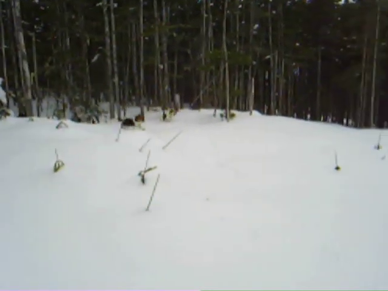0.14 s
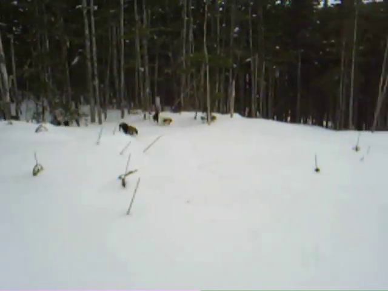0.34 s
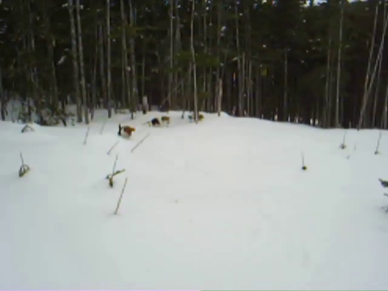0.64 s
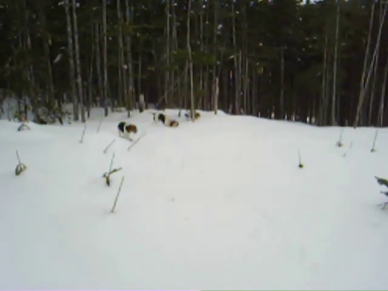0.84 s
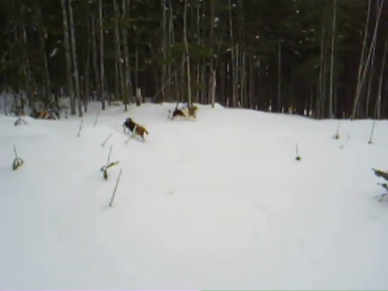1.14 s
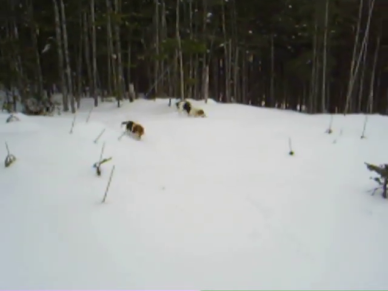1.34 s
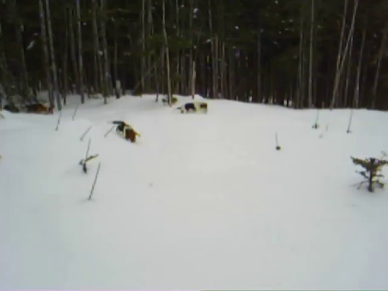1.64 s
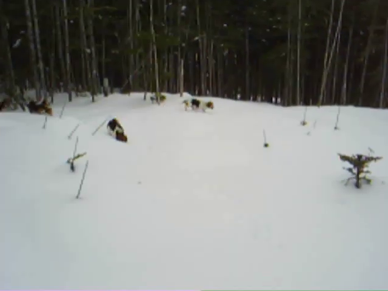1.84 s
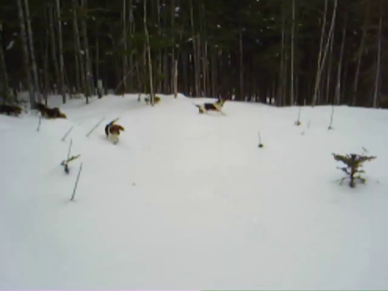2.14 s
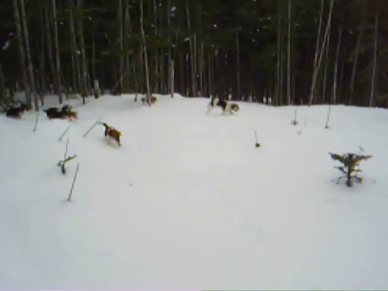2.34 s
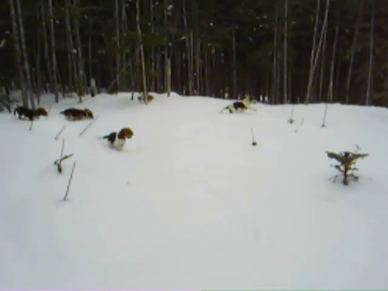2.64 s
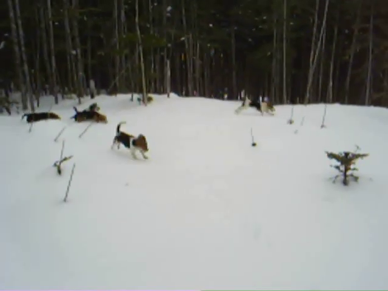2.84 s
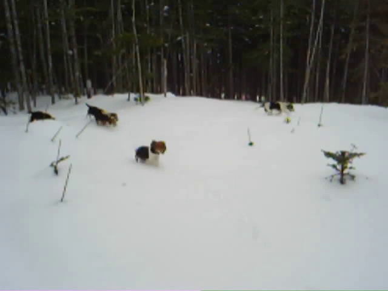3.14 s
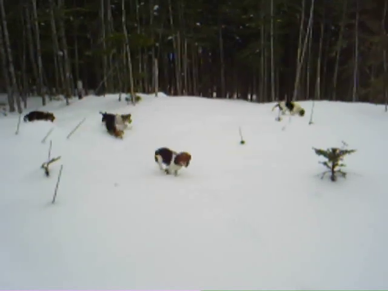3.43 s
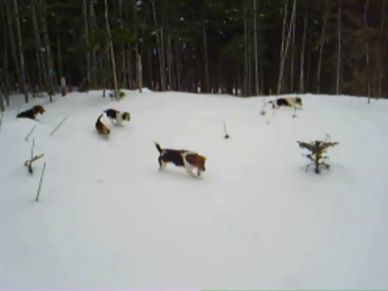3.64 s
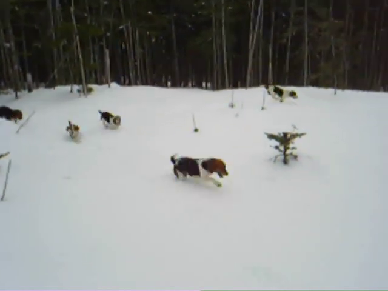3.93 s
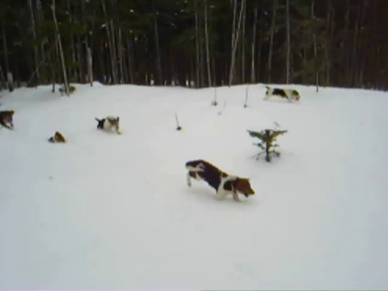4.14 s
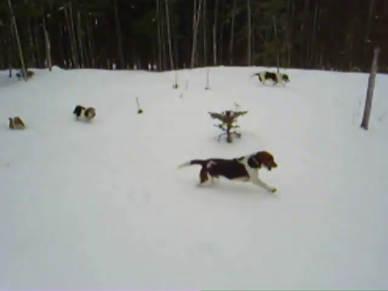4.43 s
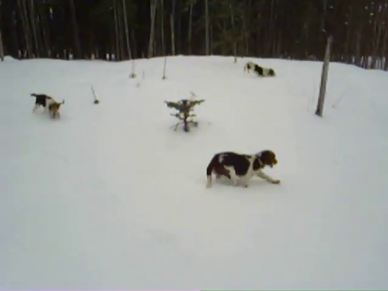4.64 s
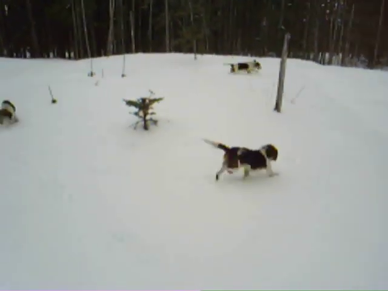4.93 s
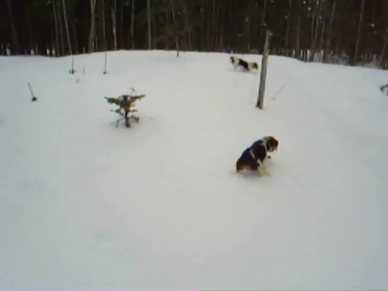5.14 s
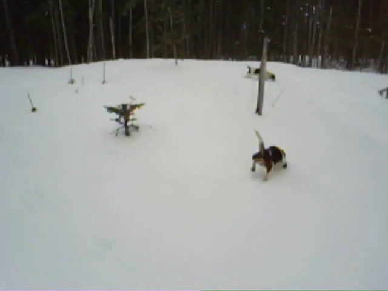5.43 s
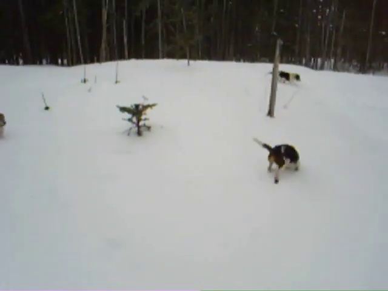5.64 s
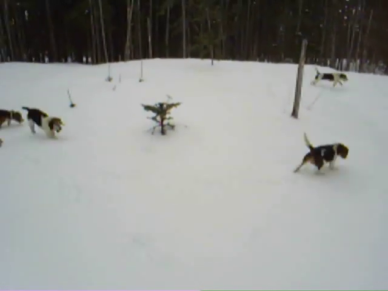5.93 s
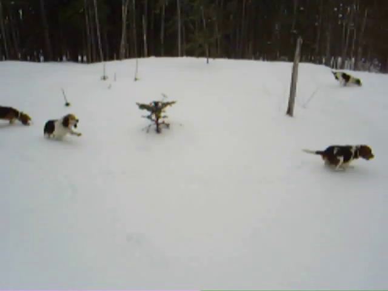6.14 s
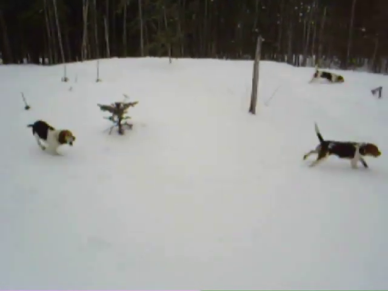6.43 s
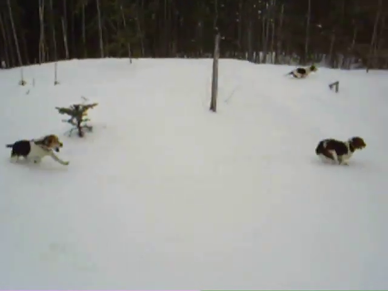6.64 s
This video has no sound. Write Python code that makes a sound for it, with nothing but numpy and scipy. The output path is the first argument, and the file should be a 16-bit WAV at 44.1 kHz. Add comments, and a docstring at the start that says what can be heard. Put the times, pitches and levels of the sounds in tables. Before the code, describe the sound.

A hound pack cries in the open by a wood, yelps flipping down into gravelly bays with brief gaps. The calls stretch into a rising high howl and a shorter ragged one, then thin out to near silence, with a tiny whine and paws in snow. A sharp call opens a last long, low howl. Woody echoes trail behind; a cheap, dull microphone distorts, with hiss swelling under the voices and small low thumps.

```python
"""A pack of beagles gives tongue at a snowy wood edge: hoarse bays and clear yelps from the start, most
calls a yelp breaking into a bay about an octave lower; later two high howls, a whine, paws and a low howl.
Voices are harmonic sums shaped by a throat response, half lines and random modulation making them hoarse.
Trunks echo them by convolution with scattered impulses, and noise makes air and paws. A narrow-band
recorder hisses as the calls swell, thumps softly as its zero line snaps back, and overloads."""
import sys
import numpy as np
from scipy import signal
from scipy.fft import rfft, irfft
from scipy.io import wavfile
from scipy.ndimage import uniform_filter1d

SR = 44100
rng = np.random.default_rng(int(sys.argv[2]) if len(sys.argv) > 2 else 0)


def digitize_waveform(pressure):
    """Quantize a signal to 16-bit integers and store it at the path in sys.argv[1].

    Rows of a 2-D input are taken as channels; values are limited to [-1, 1].
    """
    field = np.atleast_2d(pressure).T
    bounded = np.clip(field, -1, 1)
    quanta = np.round(bounded * 32767).astype(np.int16)
    wavfile.write(sys.argv[1], SR, quanta)


N = 298557
TIME = np.arange(N) / SR
BAND_EDGE_HZ = 4080


def from_db(db):
    """Level law: 20 dB is a factor of ten in amplitude."""
    return 10 ** (np.asarray(db) / 20)


def rms_one(x):
    """Normalisation to unit root-mean-square amplitude."""
    return x / np.sqrt(np.mean(x ** 2) + 1e-20)


def gain_at(points, hz):
    """Frequency response: the gain of a (frequency [Hz], level [dB]) curve, read on a log-frequency axis."""
    knots_hz, knots_db = np.transpose(points)
    return from_db(np.interp(np.log(hz + 1e-9), np.log(knots_hz), knots_db))


def coloured(x, points):
    """Spectral filtering: weights the noise spectrum, cuts it above the band edge and sets its rms to 1."""
    hz = np.fft.rfftfreq(len(x), 1 / SR)
    spectrum = rfft(x) * gain_at(points, hz) * (hz < 1.1 * BAND_EDGE_HZ)
    return rms_one(irfft(spectrum, len(x)))


def flutter(rate_hz, size):
    """Low-passed noise: a random wander up to a given rate, spread about 1."""
    run_in = SR // 8
    slow = signal.lfilter(*signal.butter(2, rate_hz, fs=SR), rng.standard_normal(size + run_in))
    return slow[-size:] / slow.std()


def note_time(start, length, edge_s):
    """Gating: the samples a note covers, its soft-edged gate, and the time since its start."""
    at = np.flatnonzero((TIME > start - edge_s) & (TIME < start + length + edge_s))
    t = TIME[at] - start
    edge = np.clip(np.minimum(t, length - t) / edge_s, -1, 1)
    gate = .5 + .5 * np.sin(np.pi / 2 * edge)
    return at, gate, np.clip(t, 0, length)


def envelope_db(t, length, swell_db, shape):
    """Amplitude envelope: attack, a hold that swells or tires, and release, all linear in dB."""
    attack_s, start_db, release_s, end_db = shape
    attack = np.clip(1 - t / attack_s, 0, 1)
    release = np.clip(1 - (length - t) / release_s, 0, 1)
    return swell_db * (t / length - .5) - start_db * attack - end_db * release


# response of throat and open mouth: (frequency [Hz], gain [dB])
THROAT = [(400, -35.5), (580, 6), (750, -1), (900, 10.5), (1100, 8.5), (1400, -4), (1700, 9), (1900, 2.5),
          (2200, 2.5), (2700, -6), (3050, -5), (3400, -2)]
LURCH = .065   # pitch bend [share of pitch] at full roughness


def vocal_folds(pitch, slope_db, doubling, rough, dull_hz, count=7, waver=0.0033):
    """Source-filter voice: unequal cycles add half lines; chaotic vibration bends and smears every line."""
    size = len(pitch)
    lurch = LURCH * rough * flutter(55, size)
    bent_pitch = pitch * (1 + lurch + waver * flutter(50, size))
    phase = 2 * np.pi * np.cumsum(bent_pitch) / SR
    wave = 0
    for k in np.arange(1, 2 * count + 1) / 2:   # whole k: harmonics; half k: period doubling
        line_hz = k * pitch
        overtone_gain = from_db(slope_db * np.log2(max(k, 1)))
        height = gain_at(THROAT, line_hz) * overtone_gain / np.hypot(1, (line_hz / dull_hz) ** 2)
        if k % 1:   # half lines pass only above the lowest throat resonance
            height = height * doubling * np.clip((line_hz - 400) / 100, 0, 1)
        # upper lines break up first
        chaos = np.clip(.85 * rough * k ** .3, 0, 1)
        smear = (flutter(125, size) + 1j * flutter(125, size)) / np.sqrt(2)
        modulation = np.sqrt(1 - chaos ** 2) + chaos * smear
        wave = wave + height * modulation * np.exp(1j * (k * phase + rng.uniform(0, 2 * np.pi)))
    # the lungs keep the strength steady however rough the tone
    power = uniform_filter1d(np.abs(wave) ** 2, SR // 90) / 2
    return wave.real / np.sqrt(power + 1e-12)


# relative spectrum of the still air: (frequency [Hz], density [dB per Hz])
AIR = [(15, -38), (25, -8.5), (395, -14), (449, -14), (1380, -14), (4000, -22), (5200, -57), (8800, -120)]
AIR_DB = -46.5   # rms level before the recorder's overload


def still_air():
    """Stationary noise: random pressure with a fixed spectrum forms the steady background."""
    return from_db(AIR_DB) * coloured(rng.standard_normal(N), AIR)


# envelope of a bay: (attack [s], depth below hold at start [dB], release [s], depth at end [dB])
BAY_SHAPE = (0.014, 7.9, 0.023, 8.3)
BREAK_ROUGH, BREAK_S = .7, .022   # extra share of roughness at the start; its decay time
FAIL_ROUGH, FAIL_BEFORE_S, FAIL_S = 0.42, 0.02, .014   # extra share near the end; its lead and spread
STEADY_ROUGH = 0.93     # share of the listed roughness present throughout
BREAK_BRIGHT_DB = 5.5   # overtone slope [dB per octave] per unit of extra roughness share
BAY_TOP_HZ = 4300       # sets the number of harmonics
# hoarse notes, mostly low with a few high squeals, each one glide; doubling and roughness are base values:
# (start [s], length [s], first pitch [Hz], last pitch [Hz], level [dB], swell over the note [dB],
#  mean overtone slope [dB per octave], period doubling [0-1], roughness [0-1])
BAYS = [ (-.02, 0.092, 590, 582, -23, 1.5, -11, .15, 0.52),
        (0.138, 0.078, 1391, 1376, -19.5, 5.5, -9, 0.22, 0.21),
        (0.202, 0.072, 1528, 1855, -22, -6, 3.5, 0.1, 0.6),
        (0.337, 0.064, 607, 611, -14.5, 11.5, -9, 0.26, 0.65),
        (0.379, .058, 608, 546, -8, -7, -15.5, .06, .2), (0.43, 0.044, 702, 638, -15, 0.5, -14, 0.33, 0.32),
        (.81, 0.16, 581.3, 544.5, -11, -6.5, -8.5, 0.23, 0.49),
        (0.933, 0.094, 688.6, 608, -25, -4.5, -10.5, 0.46, 0.48),
        (1.258, 0.051, 595, 661, -22, 5, -3, 0.1, 0.35),
        (1.299, 0.077, 701, 673.4, -13.5, 6, -7.5, 0.07, 0.38),
        (1.331, 0.169, 560.5, 563.6, -11.5, 0, -9.5, 0.23, 0.6),
        (1.758, 0.074, 591.3, 540.4, -10.5, 4, -4, 0.28, 0.36),
        (1.85, 0.089, 667, 691, -14, 1.5, -15, 0, 0.17), (1.917, .055, 718, 818, -14, 1.5, -18, 0.16, 0.07),
        (1.955, 0.066, 726.5, 675, -21, 1, -15, .05, 0.29),
        (2.021, 0.052, 736, 641, -13, 9, -8.5, 0.1, 0.9),
        (2.058, 0.096, 561.7, 565.7, -11, -1, -8.5, 0.36, 0.5),
        (2.394, 0.044, 616, 644, -16.5, 1, -6, 0.5, 0.13),
        (2.428, .09, 725.5, 835, -11.5, -3.5, -14, 0.25, .15),
        (2.518, 0.12, 642, 534.3, -11, -8.5, -8.5, 0.24, 0.4),
        (2.619, 0.03, 693, 610, -13, -3, -11.5, 0.2, 0.27),
        (2.973, .1, 671.7, 545.6, -12, -2.5, -8.5, 0.35, 0.51),
        (3.062, 0.025, 732, 645, -12.5, -4.5, -12.5, 0.06, 0.14),
        (3.37, 0.067, 734.4, 675, -17, 12.5, -9.5, 0.3, 0.88),
        (3.424, 0.27, 686.7, 683.8, -12.5, -4, -12, 0.65, 0.63),
        (4.38, 0.052, 774, 743, -17.5, -3, -8.5, 0.4, 0.22),
        (4.836, 0.11, 654.6, 668.4, -11.5, -6, -9, 0.98, 0.54),
        (6.035, 0.034, 601, 658, -18, 2.5, -10.5, 0.4, .2),
        (6.034, 0.037, 1200, 1229, -8, -6.5, -12.5, 0.16, 0.37), ]


def bays(edge_s=0.0037, dull_hz=2600):
    """Nonlinear phonation: hoarse notes, mostly low, a few squeals, rough and bright at onset and failure."""
    out = np.zeros(N)
    for start, length, first_hz, last_hz, level_db, swell_db, slope_db, doubling, rough in BAYS:
        at, gate, t = note_time(start, length, edge_s)
        pitch = first_hz + (last_hz - first_hz) * t / length
        onset = BREAK_ROUGH * np.exp(-t / BREAK_S)
        failure = FAIL_ROUGH * np.exp(-((length - t - FAIL_BEFORE_S) / FAIL_S) ** 2)
        breaking = onset + failure
        slope = slope_db + BREAK_BRIGHT_DB * (breaking - breaking.mean())
        tone = vocal_folds(pitch, slope, doubling, rough * (STEADY_ROUGH + breaking), dull_hz,
                           count=int(BAY_TOP_HZ / pitch.mean()))
        out[at] += gate * from_db(level_db + envelope_db(t, length, swell_db, BAY_SHAPE)) * tone
    return out


def chest(voice, lowest_hz=505):
    """Radiation efficiency: the small chest radiates little below its pitch, a steep high-pass."""
    return signal.sosfiltfilt(signal.butter(8, lowest_hz, "high", fs=SR, output="sos"), voice)


# relative spectrum of the recorder's hiss: (frequency [Hz], density [dB per Hz])
RECORDER_HISS = [(30, -3), (300, -1), (700, -4.5), (1500, -4), (2500, -1.5), (4000, -7)]


def recorder_hiss(voice, hiss_db=-22):
    """Signal-dependent noise: broad recorder hiss rises and falls with the strength and height of the calls."""
    steepness = np.gradient(voice) * SR / (2 * np.pi * 1000)   # equals the voice's amplitude at 1 kHz
    height, strength = np.abs(uniform_filter1d(np.array([steepness, voice]) ** 2, SR // 100))
    drive = (height * strength) ** .25   # geometric mean of the two rms values
    return from_db(hiss_db) * drive * coloured(rng.standard_normal(N), RECORDER_HISS)


# relative colour of the echo from the trunks: (frequency [Hz], gain [dB])
WOOD = [(300, 3), (600, -4), (800, -4), (1100, -5.5), (1600, -7.5), (2500, -11), (4000, -6)]


def wood(voice, echo_db=-22, near_t60=0.44, far_t60=1.12, far_db=-14, first_s=0.033):
    """Multiple scattering: near trunks give a fast decay, the deep wood a weaker, longer tail."""
    t = TIME[:int(1.5 * SR)]
    trunks = rng.standard_normal(len(t)) * (rng.random(len(t)) < 900 / SR)   # about 900 echoes a second
    fade = from_db(-60 * t / near_t60) + from_db(far_db - 60 * t / far_t60)
    build_up = np.clip(t / first_s, 0, 1) ** 2
    echoes = coloured(trunks, WOOD) * fade * build_up
    return from_db(echo_db) * signal.fftconvolve(voice, echoes / np.linalg.norm(echoes))[:N]


# envelope of a yelp: (attack [s], depth below hold at start [dB], release [s], depth at end [dB])
YELP_SHAPE = (0.023, 6.1, 0.015, 4)
YELP_ARCH_DB = 3.5   # the mouth opens in mid-note: rise of overtone slope [dB per octave]
SHIMMER_DB, SHIMMER_HZ = 1.03, 34.5   # spread and rate limit of a yelp's unsteady strength
# clear head-voice notes, each one arch of pitch; the slope is the value before the mouth's arch:
# (start [s], length [s], first pitch [Hz], middle pitch [Hz], last pitch [Hz], level [dB],
#  swell over the note [dB], overtone slope [dB per octave])
YELPS = [ (0.058, .05, 1980, 2106, 2040, -17.5, 11, -20.5), (0.1, 0.053, 1963, 1804, 1590, -21.5, -4, -3.5),
         (0.124, 0.09, 2093, 2070, 2140, -25.5, 7.5, -42), (0.3, 0.078, 1274, 1220, 1092, -15, 8.5, -5),
         (0.777, .04, 1270, 1366, 1283, -14.5, 3.5, 0), (.975, .04, 1094, 1184, 1147, -24, 3.5, -20),
         (1.242, 0.023, 887, 872, 834.3, -15, 4.5, -21), (1.274, 0.12, 1202, 1392, 1387, -15.5, 0, -7.5),
         (1.709, 0.064, 1386, 1529, 1418, -16, 6, -2.5), (1.822, 0.036, 1285, 1254, 1139, -15, -3, -9.5),
         (1.994, .032, 1430, 1450, 1360, -23.5, 5, 5), (2.137, 0.025, 1077, 1178, 988, -10, 1, -12),
         (2.345, .062, 1024, 1004, 830, -8, 0.5, -9), (2.397, 0.064, 1219, 1280, 1306, -13, -13.5, -35),
         (2.484, 0.039, 1327, 1342, 1286, -10.5, -6.5, 3.5), (2.938, 0.057, 1265, 1280, 1114, -10, 2, -2),
         (3.356, 0.037, 990, 918, 868, -24, 9, -9), (3.37, 0.031, 1370, 1302, 1176, -24, 14, -8),
         (4.267, 0.011, 2275, 2253, 2224, -26.5, -2.5, -37.5),
         (4.289, .038, 1507, 1309, 1140, -6.5, -7, -3.5), (4.774, .02, 2160, 2230, 2220, -32.5, -1, -27),
         (4.804, .038, 1445, 1361, 1200, -8, -5.5, -1), (4.935, 0.041, 1078, 1098, 1004, -14.5, -18, -19),
         (5.53, 0.02, 887, 923, 1007, -40, -4, -22), (5.54, 0.033, 2078, 1850, 2080, -39, -3.5, -24),
         (5.581, 0.1, 2240, 2730, 2050, -42.5, 4.5, -26), (5.763, 0.019, 3370, 2950, 2550, -44, -6, -30),
         (5.88, 0.013, 943, 1043, 1090, -31.5, -9, -20), (6.019, 0.021, 1025, 1069, 1058, -1, -6, -33),
         (6.276, 0.05, 1426, 1361, 1270, -18, -10, -7.5), (6.66, 0.12, 1164, 1218, 1062, -8, -1.5, -19.5), ]


def yelps(edge_s=.004, dull_hz=7000):
    """Near-sinusoidal phonation: yelps and whines of pitch and octave, more ragged the higher they go."""
    out = np.zeros(N)
    for start, length, first_hz, middle_hz, last_hz, level_db, swell_db, slope_db in YELPS:
        at, gate, t = note_time(start, length, edge_s)
        arch = 1 - (2 * t / length - 1) ** 2
        glide = first_hz + (last_hz - first_hz) * t / length
        pitch = glide + arch * (middle_hz - (first_hz + last_hz) / 2)
        rough = np.interp(pitch, [1200, 1900], [.06, .24])
        tone = vocal_folds(pitch, slope_db + YELP_ARCH_DB * (arch - .5), 0, rough, dull_hz, count=2)
        shimmer_db = SHIMMER_DB * flutter(SHIMMER_HZ, len(t))
        strength_db = level_db + shimmer_db + envelope_db(t, length, swell_db, YELP_SHAPE)
        out[at] += gate * from_db(strength_db) * tone
    return out


# sags of the zero line: (sag start [s], snap back [s], depth before the band filter [full scale])
THUMPS = [(0.075, .486, 0.0308), (0.374, .486, 0.071), (0.842, 0.991, 0.095), (1.317, 1.502, 0.074),
          (1.776, 1.882, 0.13), (2.058, 2.137, 0.07), (2.082, 2.264, 0.037), (2.4, 2.65, 0.097),
          (2.949, 3.027, 0.078), (3.44, 4.046, .03), (3.608, 3.663, 0.074), (3.787, 3.913, 0.08),
          (4.288, 4.551, 0.078), (4.805, 4.935, 0.09), (4.795, 5.061, 0.022), (6.009, 6.072, 0.083),
          (6.077, 6.338, 0.11), (6.327, 6.463, 0.09), (6.599, 6.792, 0.093)]


def thumps(sag_s=0.02):
    """Baseline shift: the zero line sinks gradually and jumps back at once, a soft thump."""
    return -sum(depth * np.clip((TIME - start) / sag_s, 0, 1) * (TIME < end)
                for start, end, depth in THUMPS)


# courses of the long held notes: (time [s], pitch [Hz], level [dB])
HIGH_HOWL = [(3.58, 938, -18.5), (3.606, 953.5, -14.5), (3.648, 963, -12.5), (3.66, 978, -12.5),
             (3.686, 1034, -14.5), (3.75, 1096, -13), (3.786, 1130, -9.5), (3.886, 1054, -11),
             (3.926, 1073, -13.5), (3.962, 1238, -13), (3.975, 1290, -29)]
SHORT_HOWL = [(4.323, 1199, -10.5), (4.341, 1089, -7), (4.383, 1054, -8), (4.417, 1001, -9),
              (4.435, 1132, -12), (4.447, 1080, -12), (4.471, 1190, -18.5), (4.484, 1120, -36)]
NEAR_HOWL = [(6.056, 643.6, -16.5), (6.086, 737, -8), (6.176, 717.7, -9), (6.2, 715, -7), (6.26, 744, -7.5),
             (6.354, 736.6, -10), (6.39, 745.0, -10.5), (6.41, 731, -16), (6.434, 737.4, -10.5),
             (6.49, 726.6, -11.5), (6.536, 678, -14), (6.596, 685, -10.5), (6.628, 792, -6.5),
             (6.654, 871.5, -11), (6.66, 903, -23)]
# howls: (course, base overtone slope [dB per octave])
HOWLS = [(HIGH_HOWL, -7), (SHORT_HOWL, -8.5), (NEAR_HOWL, -22.5)]
# moments of strain: (centre [s], half width [s], added period doubling [0-1], added roughness [0-1],
#  added overtone slope [dB per octave])
STRAINS = [ (3.62, 0.072, .1, 0.16, -12), (4.35, 0.034, .3, 0.093, 4), (4.41, 0.027, 0.47, .25, 1),
           (6.067, 0.013, 0.34, 0.29, 11.5), (6.108, 0.017, 0.68, 0.022, 2), (6.36, 0.041, .6, 0.46, 0),
           (6.539, 0.035, 0.15, .24, 6.5), (6.585, 0.024, .03, 0.018, 10.5), ]
HOWL_ROUGH = 0.039     # roughness outside the strains
HOWL_TOP_HZ = 3000     # sets the number of harmonics
# the harder a howl is pushed, the purer: overtone slope lost per dB above this level
PURITY, PURE_FROM_DB = .5, -9


def howls(edge_s=0.0042, dull_hz=2600):
    """Bifurcating phonation: long clear notes turn hoarse, gain half lines and change colour under strain."""
    out = np.zeros(N)
    for course, slope_db in HOWLS:
        s, pitch, level_db = np.transpose(course)
        at, gate, _ = note_time(s[0], s[-1] - s[0], edge_s)
        t = TIME[at]
        effort_db = np.interp(t, s, level_db)
        doubling, rough, bright_db = sum(
            np.outer(change, np.exp(-((t - centre) / half) ** 4)) for centre, half, *change in STRAINS)
        slope = slope_db + bright_db - PURITY * (effort_db - PURE_FROM_DB)
        tone = vocal_folds(np.interp(t, s, pitch), slope, doubling, HOWL_ROUGH + rough, dull_hz,
                           count=int(HOWL_TOP_HZ / pitch.mean()))
        out[at] += gate * from_db(effort_db) * tone
    return out


# paws breaking the snow crust: (time [s], peak level before the grain [dB], Gaussian half length [s])
PAWS = [(5.84, -41, 0.021), (5.931, -46.5, 0.03)]


def paws(grain_db=4):
    """Granular fracture: short bursts of noise, randomly modulated in level, crunch in the snow."""
    press = sum(from_db(db) * np.exp(-.5 * ((TIME - s) / half) ** 2) for s, db, half in PAWS)
    grains = rng.standard_normal(N) * from_db(grain_db * flutter(300, N))
    return press * coloured(grains, [(100, 0), (700, -4.5), (2500, -11), (4000, -26)])


def scene():
    """Superposition: the pack, its echo, the paws, the still air and the recorder's hiss add."""
    voice = yelps() + chest(bays() + howls())
    return (voice + recorder_hiss(voice) + wood(voice) + paws() + still_air())[None]


CUTOFF_HZ = 15900   # stopband edge of the last low-pass


def record(dry, knee=0.62):
    """Saturation and band limiting: a narrow-band recorder rounds peaks, drifts in zero line and clips."""
    rounded = dry / (1 + (dry / knee) ** 8) ** (1 / 8)
    band_filter = signal.ellip(8, .3, 80, BAND_EDGE_HZ, fs=SR, output="sos")
    narrow = signal.sosfilt(band_filter, rounded + thumps())
    clipped = np.clip(narrow, -.7, .71)
    return signal.sosfilt(signal.cheby2(12, 70, CUTOFF_HZ, fs=SR, output="sos"), clipped)


dry = scene()
out = record(dry)
digitize_waveform(out)
```